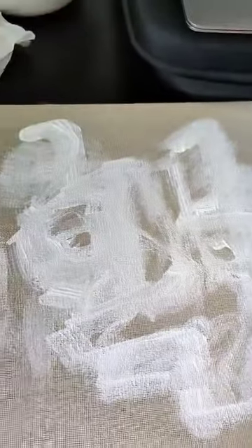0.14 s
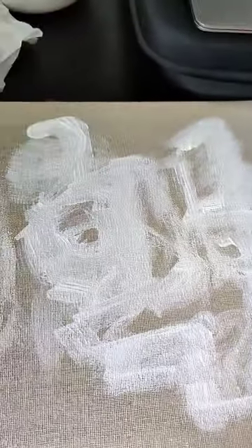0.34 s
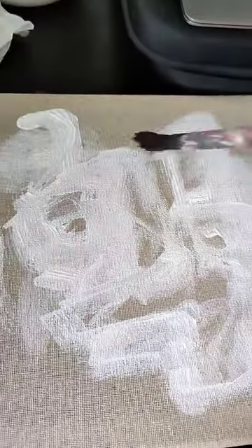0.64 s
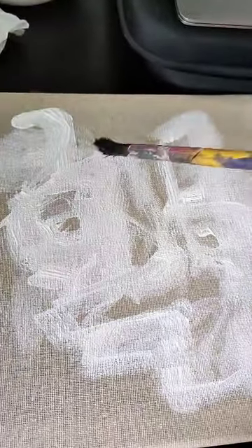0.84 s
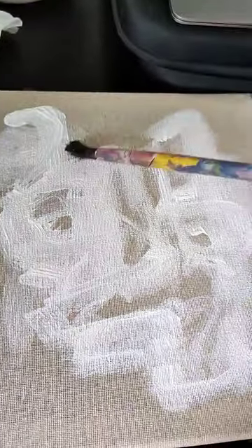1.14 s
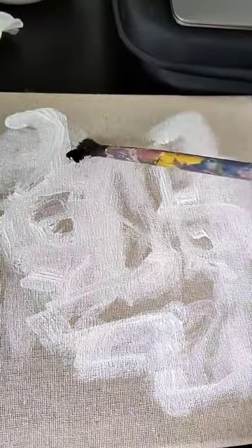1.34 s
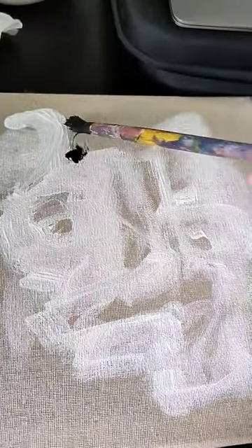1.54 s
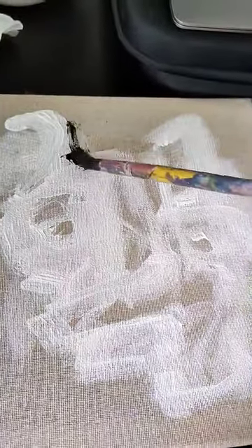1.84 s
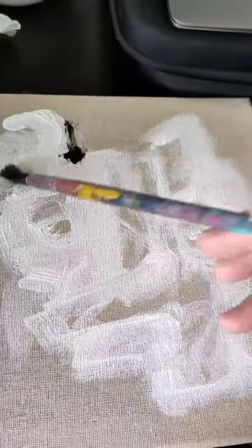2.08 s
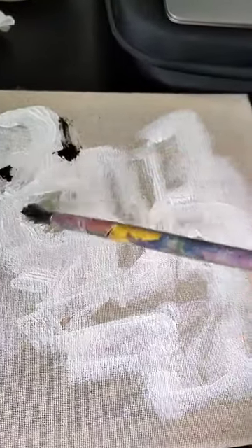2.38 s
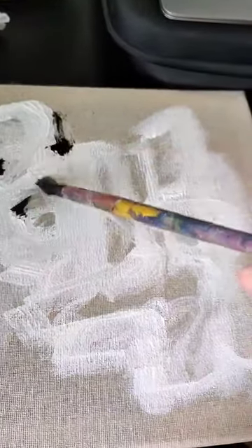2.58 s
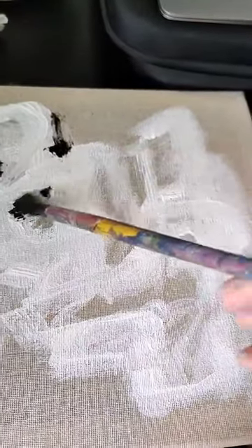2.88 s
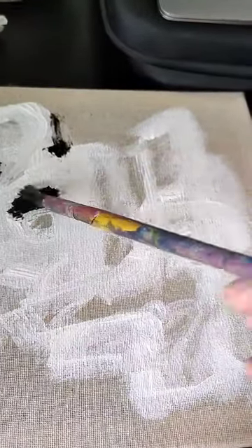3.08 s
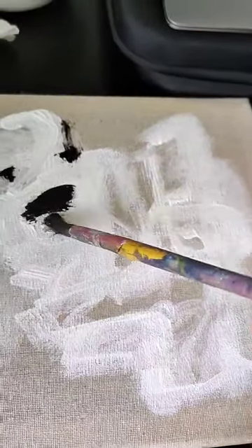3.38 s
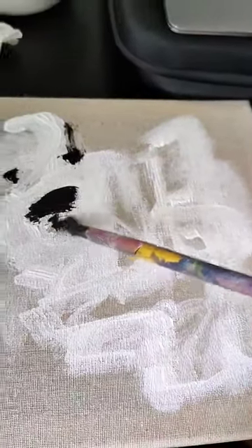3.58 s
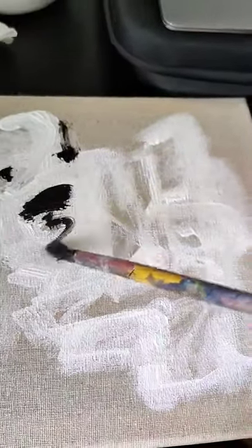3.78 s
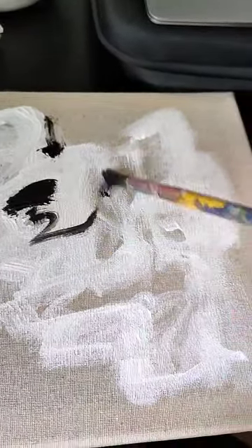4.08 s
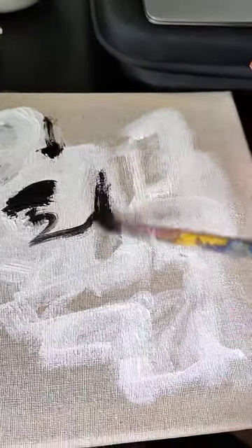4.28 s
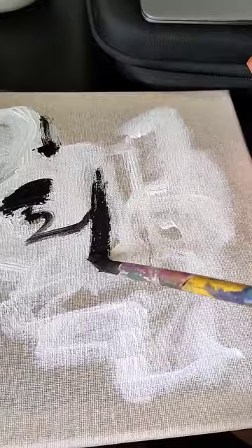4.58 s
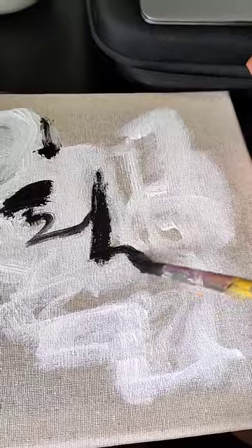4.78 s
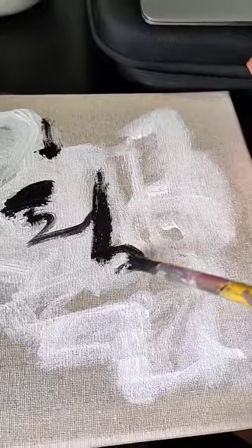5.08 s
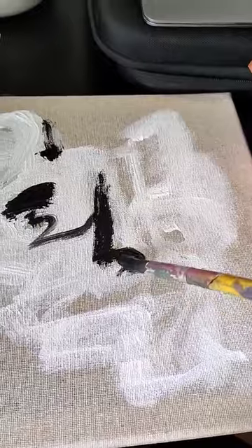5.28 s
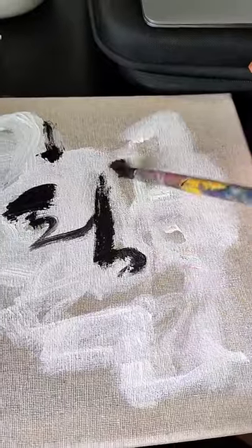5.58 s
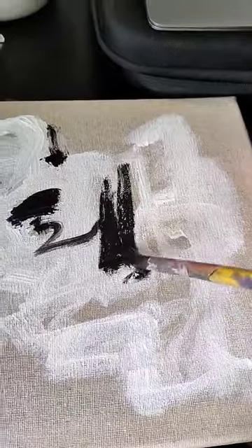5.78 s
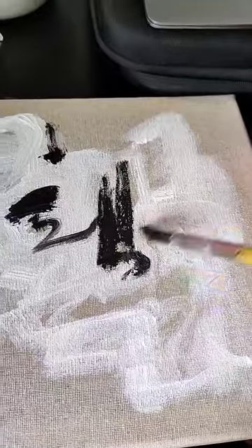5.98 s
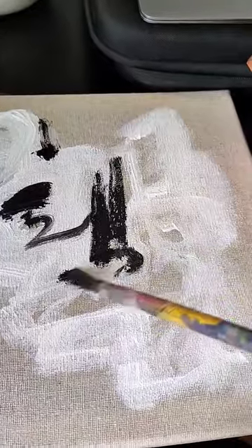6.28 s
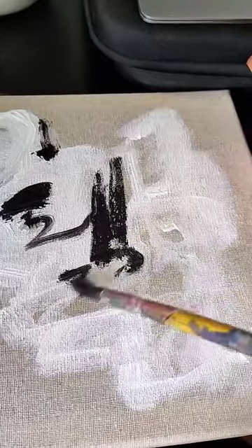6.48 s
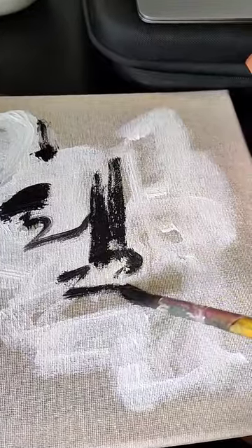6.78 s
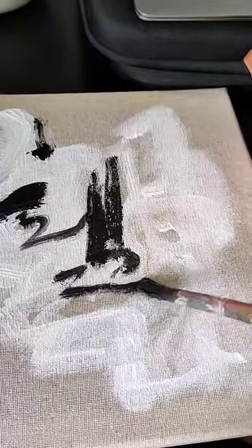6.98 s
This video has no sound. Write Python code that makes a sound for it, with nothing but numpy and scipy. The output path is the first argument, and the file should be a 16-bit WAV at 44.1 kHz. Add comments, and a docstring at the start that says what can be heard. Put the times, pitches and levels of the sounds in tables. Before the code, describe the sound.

In a small room, loud sharp table knocks come first and are over within a third of a second. Then come soft, irregular paintbrush sounds: dull pats, short rubs and whispery bristle scrapes on cloth, busiest around four seconds. Behind lie steady deep hum, wavering engine boom through the walls and faint traffic rush that rises at the end. Close stereo phone microphones.

```python
"""Heard first: hard knocks on a table, then a bristle brush dabbing and dragging paint over a canvas lying on it.
The place is a small room, with the brush close to a phone's two microphones. Random snaps of the bristles, filtered,
give the rub and hiss; once the brush judders and squeaks in wavering tones. The knocks are decaying modes and noise.
Behind them an appliance hums in steady lines, an engine drones through the walls as two orders of its shaft rate,
and filtered noise makes the traffic rush and the room air."""
import sys
import numpy as np
from scipy import signal
from scipy.fft import rfft, irfft, next_fast_len
from scipy.io import wavfile
from scipy.ndimage import uniform_filter1d

SR = 44100
rng = np.random.default_rng(int(sys.argv[2]) if len(sys.argv) > 2 else 0)


def pcm_store(signal):
    """Save signal as 16-bit PCM."""
    levels = np.round(np.clip(np.atleast_2d(signal), -1, 1) * 32767)
    wavfile.write(sys.argv[1], SR, levels.astype(np.int16).T)


N = 314874
T = np.arange(N) / SR
SIZE = next_fast_len(N + SR)  # room for filter tails
FREQ = np.maximum(np.arange(SIZE // 2 + 1) * SR / SIZE, 1)
LEFT_RIGHT = np.array([[.5], [-.5]])  # halves a difference between the two microphones


def undb(db):
    """Decibels to gain."""
    return 10 ** (np.asarray(db) / 20)


def unit(x):
    """Scale to rms 1."""
    return x / np.sqrt(np.mean(x ** 2))


def curve(rows):
    """Each column of a table of times, interpolated at every sample."""
    s, *columns = np.transpose(rows)
    return [np.interp(T, s, column) for column in columns]


def gains(points):
    """Gain at every frequency from points of frequency and dB."""
    hz, db = np.transpose(points)
    return undb(np.interp(np.log(FREQ), np.log(hz), db))


def colour(points, band):
    """Causal response with the given spectrum; unit white noise comes out at rms 1 inside the band."""
    gain = gains(points) + 1e-5
    in_band = (FREQ > band[0]) * (FREQ < band[1])
    gain = gain / np.sqrt(np.mean(gain ** 2 * in_band))
    # folding the cepstrum onto positive times gives minimum phase
    cepstrum = irfft(np.log(gain), SIZE)
    fold = 1 + np.sign(SIZE / 2 - np.arange(SIZE)) * (np.arange(SIZE) > 0)
    return np.exp(rfft(cepstrum * fold))


def through(x, response):
    """Filter by a frequency response."""
    return irfft(rfft(x, SIZE) * response, SIZE)[..., :N]


def walk(rate):
    """Smooth chance with spread near 1, from random steps drawn at a rate in Hz."""
    k = max(int(SR / rate), 2)
    steps = np.repeat(rng.standard_normal(N // k + 2), k)
    return 1.3 * uniform_filter1d(uniform_filter1d(steps, k), k)[:N]


def sine(hz):
    """A tone of rms 1 that follows a frequency curve from a random phase."""
    cycles = np.cumsum(hz + 0 * T) / SR + rng.random()
    return np.sqrt(2) * np.sin(2 * np.pi * cycles)


def ring(modes):
    """Response of a set of decaying modes, with unit energy; neighbours start in opposite directions."""
    t = T[:SR // 2]
    wave = np.zeros(len(t))
    for k, (hz, db, t60_s) in enumerate(modes):
        wave += (-1) ** k * undb(db - 60 * t / t60_s) * np.sin(2 * np.pi * hz * t)
    return wave / np.linalg.norm(wave)


def bursts(times, dbs, decay_s, rise_s=0.00073):
    """Envelope of contacts that start quickly and die away."""
    out, t = np.zeros(N + SR), T[:SR // 10]
    shape = (1 - np.exp(-t / rise_s)) * np.exp(-t / decay_s)
    for s, db in zip(times, dbs):
        start = int(s * SR)
        out[start:start + len(t)] += undb(db) * shape
    return out[:N]


def snaps(per_s, spread_db, alike=0.57):
    """Random tiny clicks of very unequal size; each radiates differently towards the two microphones."""
    happens = rng.random(N) < per_s / SR
    size = happens * undb(spread_db * np.minimum(rng.exponential(size=N), 5))
    shared, *own = rng.choice([-1, 1], (3, N))
    return unit(size * (np.sqrt(alike) * shared + np.sqrt(1 - alike) * np.array(own)))


# What the furnished room sends back. Columns: frequency_hz, gain_db
ROOM_COLOUR = [(300, 3), (1300, -1.5), (3800, 1.5), (5300, 0.5), (7000, 0.5), (9500, -2), (15000, -8)]
# Colour of the left and right microphone ports. Columns: frequency_hz, gain_db
LEFT_PORT_COLOUR = [(300, -3), (700, -2), (1080, 6.5), (1900, -4), (2200, -1), (2650, -0.5), (4000, 0),
                    (5300, -0.5), (6500, -3.5), (8100, -11.5), (9200, 7), (10800, -8.5), (12000, -4.5),
                    (15000, -11)]
RIGHT_PORT_COLOUR = [(300, 0), (700, -4), (1250, -3), (1600, -7), (1950, -4), (2600, 1.5), (4100, -7),
                     (5100, 0.5), (6200, -19), (8300, -3), (9500, 11.5), (10200, 1.5), (10850, 7),
                     (11800, -12), (15000, -3.5)]


def place(x, lag_ms, early_db, early_s, room_db, t60_s):
    """Two microphone ports hear the direct sound, left first by the lag, then the table top, then the room."""
    t = T[:SR // 2]
    early = rng.standard_normal((2, len(t))) * np.exp(-t / early_s) * (t > .0015)
    late = rng.standard_normal((2, len(t))) * undb(-60 * t / t60_s) * (t > .008)
    early, late = (rfft(h / np.linalg.norm(h[0]), SIZE) for h in (early, late))
    direct = np.exp(2j * np.pi * FREQ * LEFT_RIGHT * lag_ms / 1000)
    paths = direct + undb(early_db) * early + undb(room_db) * gains(ROOM_COLOUR) * late
    ports = np.array([gains(LEFT_PORT_COLOUR), gains(RIGHT_PORT_COLOUR)])
    return through(x, paths * ports)


# Spectrum of the room air. Columns: frequency_hz, relative_density_db
AIR_COLOUR = [(15, -5), (25, 4.5), (45, 0.5), (66, 1.5), (95, -12.5), (160, -9.5), (250, -16.5), (400, -21),
              (630, -25), (1000, -29), (2300, -34.5), (3300, -39), (7500, -57.5), (10000, -51.5),
              (12000, -57.5), (15000, -97)]
# Width of the air. Columns: frequency_hz, side_minus_mid_db
AIR_WIDTH = [(60, -5), (110, -6), (200, -5.5), (380, -7), (690, -1.5), (1280, -0.5), (2350, -0.5),
             (4340, 1), (8000, 0.5), (14700, -2)]
# Lean of the air between the microphones. Columns: frequency_hz, left_minus_right_db
AIR_LEAN = [(60, 4), (110, 4.5), (200, -1.5), (380, -0.5), (690, -4), (1280, -0.5), (2350, -2), (4340, 6),
            (8000, 0), (14700, -7.5)]
# Course of the air, before the trim air_db. Columns: time_s, relative_level_db
AIR_COURSE = [(0, -66.5), (.5, -71.5), (.95, -67), (1.35, -70.5), (1.8, -67.5), (2.3, -71), (3.6, -72.5),
              (4.4, -71), (6.3, -71), (7.14, -68)]


def room_tone(air_db=1):
    """Soft air and rumble: filtered noise, more alike at both microphones in the bass and more diffuse above."""
    mid, side = rng.standard_normal((2, N))
    side = through(side, gains(AIR_WIDTH))
    response = colour(AIR_COLOUR, (500, 4000)) * gains(AIR_LEAN) ** LEFT_RIGHT
    air = through(np.array([mid + side, mid - side]), response)
    return air * undb(air_db + curve(AIR_COURSE)[0])


# Course of the traffic rush. Columns: time_s, relative_level_db
RUSH_COURSE = [(0, -68), (1.3, -79.5), (1.8, -63), (2.4, -84), (4.3, -76.5), (6.2, -72.5), (7.14, -59.5)]
# Spectrum of the rush. Columns: frequency_hz, relative_density_db
RUSH_COLOUR = [(40, -25), (130, -9), (300, 0.5), (420, -8.5), (620, -9), (900, -29), (2500, -30.5),
               (15000, -63)]


def traffic_rush():
    """Broad rush of the traffic around the engine: noise partly shared by the two microphones."""
    turbulence = unit(rng.standard_normal(N) + rng.standard_normal((2, N)) / 2)
    return undb(RUSH_COURSE_DB()) * through(turbulence, colour(RUSH_COLOUR, (180, 800)))


def RUSH_COURSE_DB():
    """Level of the rush at every sample."""
    return curve(RUSH_COURSE)[0]


# Engine outside, slowing and then picking up. Columns: time_s, shaft_rate_hz
ENGINE_SHAFT = [(0, 29.6), (.45, 28.8), (2.3, 28.5), (3.3, 27.3), (4.3, 25.4), (5.3, 25.5), (6, 25.9),
                (6.5, 28), (7.14, 31)]
# Its two booming orders, before throb and lean. Columns: time_s, fourth_order_db, fifth_order_db
ENGINE_ORDERS = [(0, -49.5, -59.5), (.4, -52, -71), (.85, -43.5, -65), (1.1, -53, -81), (1.45, -44.5, -59),
                 (1.8, -43.5, -61.5), (2.05, -48.5, -53.5), (2.3, -63.5, -63.5), (3.25, -58.5, -70),
                 (3.7, -70, -65.5), (4.3, -61, -62.5), (4.8, -68.5, -59.5), (5.95, -58.5, -51.5),
                 (6.3, -58.5, -68.5), (6.8, -61.5, -50), (7.14, -49, -64.5)]


def engine(left_db=2.0, hunt_hz=.1, throb_db=1.9):
    """Tones at four and five times a drifting shaft rate, throbbing, and stronger in the left microphone."""
    fourth_db, fifth_db = curve(ENGINE_ORDERS)
    shaft_hz = curve(ENGINE_SHAFT)[0] + hunt_hz * walk(12)
    fourth = undb(fourth_db + throb_db * walk(12)) * sine(4 * shaft_hz)
    fifth = undb(fifth_db + throb_db * walk(12)) * sine(5 * shaft_hz)
    return undb(LEFT_RIGHT * left_db) * (fourth + fifth)


# Course of the appliance hum, which its lines add to. Columns: time_s, level_db
HUM_COURSE = [(0, -49.5), (1.9, -49), (2.7, -55), (4.4, -52), (5, -54.5), (5.7, -50), (7.14, -55)]
# Lines of the hum. Columns: pitch_hz, level_db relative to the course, waver_db
APPLIANCE_LINES = [(76.9, -0.5, .5), (52.5, -4.5, 2.5), (153.8, -19.5, 2), (191.2, -21.5, 4),
                   (295.6, -31, 4), (613, -35.5, 3), (2090, -34.5, 2)]


def appliance(pitch_waver_hz_per_db=0.385):
    """Steady lines that waver a little in level and pitch, alike at both microphones."""
    hum = np.zeros(N)
    for hz, db, waver_db in APPLIANCE_LINES:
        level = undb(db + waver_db * walk(7.1))
        hum += level * sine(hz + pitch_waver_hz_per_db * waver_db * walk(8))
    return undb(curve(HUM_COURSE)[0]) * hum


# Hard knocks on the table, before the trims of ring, thud and crack.
# Columns: start_s, click_db, thud_db, spot (0 = edge to 1 = middle)
TABLE_KNOCKS = [(.0085, -15, -19, 0), (.0115, -18, -25, 0), (.069, -27, -30, 0), (.2432, -19, -21, 1),
                (.2462, -8, -11.5, 1), (.313, -33, -32, 1)]
# What the knocked thing rings with. Columns: pitch_hz, t60_s, edge_relative_db, middle_relative_db
KNOCKED_THING = [(1590, .035, -3, -4), (2020, .03, 2, -4), (2700, .035, -9, -1), (3080, .025, 1, -12),
                 (3260, .04, -10, 4), (3860, .035, -8, 5), (4170, .025, -9, 0), (4560, .02, -6, -20),
                 (5260, .015, -6, -11), (5950, .012, -12, -10), (6700, .012, -8, -9),
                 (9250, .008, -12, -14), (11400, .008, -12, -15)]
# The table under it. Columns: pitch_hz, relative_db, t60_s
TABLE_BODY = [(189.6, 4, 0.29), (250, -4.5, 0.24), (310, -6.5, 0.23), (404, -5.5, 0.15), (500, 1, 0.07)]


def knocks(ring_db=-2, thud_db=-4):
    """Short hard contacts: a quick ring that depends on the spot struck, and a thud of the table."""
    hz, t60_s, edge, middle = np.transpose(KNOCKED_THING)
    table = ring(TABLE_BODY)
    out = np.zeros(N)
    for s, click, thud, spot in TABLE_KNOCKS:
        clack = ring(zip(hz, edge + spot * (middle - edge), t60_s))
        blow = undb(click + ring_db) * clack + undb(thud + thud_db) * table
        start = int(s * SR)
        out[start:start + len(blow)] += blow
    return out


# Spectrum of the crack of a knock. Columns: frequency_hz, relative_density_db
CRACK_COLOUR = [(200, -7), (500, -6), (1000, -8), (1650, -1), (2300, -1), (3400, -1), (4100, -1),
                (5000, -4), (8000, -7), (9500, -14), (11500, -8), (14000, -25)]


def cracks(crack_db=-32, decay_s=0.0032):
    """The broad crack of each knock: a brief burst of dense, filtered clicks."""
    s, click, _, _ = np.transpose(TABLE_KNOCKS)
    contact = bursts(s, click + crack_db, decay_s) * snaps(25000, 0.83)
    return through(contact, colour(CRACK_COLOUR, (500, 15000)))


# The juddering brush and the cloth it shakes; level before flutter, width before scaling by waver.
# Columns: swell_peak_s, swell_spread_s (standard deviation), pitch_hz, width_hz, level_db
JUDDER_TONES = [(2.738, 0.016, 912, 45, -52.5), (2.722, 0.015, 1170, 70, -58),
                (2.751, 0.0065, 1220, 260, -59), (2.705, 0.0079, 470, 110, -58),
                (2.754, 0.023, 290, 35, -48), (2.75, 0.035, 395, 110, -55.5), (2.8, 0.036, 275, 90, -57.5)]


def squeak(waver=0.456, flutter_db=4.0):
    """The loaded brush judders on the taut cloth: a few rough, wavering tones swell and fade."""
    out = np.zeros(N)
    for peak_s, spread_s, hz, width_hz, db in JUDDER_TONES:
        swell = np.exp(-((T - peak_s) / spread_s) ** 2 / 2)
        level = undb(db + flutter_db * walk(220))
        out += level * swell * sine(hz + waver * width_hz * walk(2 * width_hz))
    return out


def speed(start, length, crest):
    """The hand speeds up to its crest and slows again along a sine, 0 to 1."""
    times = [start, start + crest * length, start + length]
    return np.sin(np.pi / 2 * np.interp(T, times, [0, 1, 0]))


# Strokes of the brush, levels before the trims in brush(); crest is the moment of top speed.
# Columns: start_s, length_s, crest (share of length), cloth_rub_db, tip_hiss_db, scratchy_bite_db
BRUSH_STROKES = [ (0.886, .15, .3, -74.5, -92, -6), (1.062, 0.099, .3, -80, -83, 0),
                 (1.412, 0.25, 0.28, -68, -82, -3), (1.603, 0.067, 0.58, -53, -69.5, -12),
                 (1.76, 0.083, 0.4, -53.5, -66, 6), (1.899, 0.16, 0.36, -66, -72.5, 4.5),
                 (2.295, 0.097, .55, -69, -80, 0), (2.658, 0.12, 0.85, -55, -68, -1.5),
                 (3.081, 0.11, 0.19, -59, -69.5, 1.5), (3.339, 0.095, 0.23, -58.5, -70.5, -1.5),
                 (3.751, .08, 0.36, -66.5, -77, 3.5), (3.862, 0.1, 0.72, -66.5, -81, -1),
                 (3.958, 0.31, 0.22, -63.5, -75.5, 1.5), (4.131, .12, 0.58, -54, -67, 1),
                 (4.234, 0.065, 0.87, -52.5, -56, 1), (4.36, 0.25, 0.63, -56, -65.5, 0.5),
                 (4.804, 0.11, 0.31, -65, -74, 2.5), (4.992, .16, 0.68, -74.5, -78, 4),
                 (5.237, 0.069, .4, -66, -72, 3), (5.347, 0.17, 0.34, -67.5, -77.5, 0.5),
                 (5.562, 0.032, .65, -57, -56.5, 1), (5.564, .12, 0.35, -60.5, -61.5, 3),
                 (5.635, 0.083, 0.6, -59, -74, 1), (5.799, .18, 0.37, -57, -67, 0.5),
                 (6, .12, .45, -70, -82, -5), (6.456, 0.081, 0.47, -62.5, -73, 4),
                 (6.535, 0.06, .45, -71, -84, 0), (6.64, 0.089, 0.54, -72, -89, 0),
                 (6.729, 0.25, 0.46, -60, -71.5, 0.5), (6.945, 0.21, 0.33, -60, -68.5, 2)]


def strokes(rub_power=1.36, tips_power=1.56):
    """Strength of rub, scratch and hiss, each growing with a power of the brush's speed."""
    rub, scratch, tips = np.zeros((3, N))
    for start, length, crest, rub_db, tips_db, bite_db in BRUSH_STROKES:
        v = speed(start, length, crest)
        cloth = undb(rub_db) * v ** rub_power
        rub += cloth
        scratch += cloth * (undb(bite_db) - 1)  # added to the rub, this boosts or cuts the scratch band
        tips += undb(tips_db) * v ** tips_power
    return rub, scratch, tips


# The brush lands or a tuft flicks free; body before the trim dab_db. Columns: start_s, body_db, tips_db
BRUSH_DABS = [(1.383, -57, -67), (1.597, -58, -78), (1.632, -53, -64), (1.656, -53.5, -54.5),
              (1.776, -49, -72), (1.82, -53.5, -62), (1.93, -57, -77), (1.97, -58, -53),
              (2.638, -52.5, -71), (3.072, -56, -73), (3.335, -57.5, -69), (3.35, -66, -64),
              (4.183, -45, -56), (4.227, -44, -75), (4.27, -62, -54), (4.288, -45, -73), (4.295, -46, -58),
              (4.355, -55.5, -88), (5.42, -71, -74), (5.476, -60.5, -60.5), (5.58, -56, -63),
              (5.691, -57, -51.5), (5.765, -52.5, -74), (5.778, -52, -64), (6.393, -56.5, -78),
              (6.406, -53, -67)]
# Spectrum of the rubbed cloth. Columns: frequency_hz, relative_density_db
RUB_COLOUR = [(120, -18.5), (250, 5), (450, -0.5), (700, -1.5), (1000, -1), (1600, 2.5), (2600, -3),
              (4000, -9), (6000, -13), (8000, -21.5), (15000, -34.5)]
# Spectrum of the bristle tips. Columns: frequency_hz, relative_density_db
TIPS_COLOUR = [(1500, -15.5), (3500, -5), (5000, -2.5), (7000, -2), (9500, -10), (11200, -0.5), (12200, -6),
               (14000, -5.5), (15200, -22)]
# The band that scratches. Columns: frequency_hz, gain_db
SCRATCH_BAND = [(700, -28), (1600, -7), (2500, -1), (3200, 1), (4500, -11), (7500, -28)]


def brush(tips_db=-2, dab_db=4, dab_bite_db=3.0, tips_patchy_db=1.5, weave_share=0.11, drift_db=2, dab_s=0.0029):
    """Bristles catch on the threads and snap free: the cloth gives a dry rub, the tips a fine hiss."""
    rub, scratch, tips = strokes()
    # tufts ripple as they cross the weave, at a wandering rate around 170 Hz
    ripple = 1 + weave_share * sine(170 * np.exp(.3 * walk(17))) / 2
    bristles = ripple * snaps(2800, 2.54)
    tuft = snaps(25000, .6)
    s, body, hiss = np.transpose(BRUSH_DABS)
    landing = bursts(s, body + dab_db, dab_s) * tuft
    flick = bursts(s, hiss, dab_s) * tuft
    bite = scratch * bristles + (undb(dab_bite_db) - 1) * landing
    cloth_force = rub * bristles + landing + through(bite, gains(SCRATCH_BAND))
    tip_force = tips * bristles * undb(tips_db + tips_patchy_db * walk(70)) + flick
    cloth_sound = through(cloth_force, colour(RUB_COLOUR, (800, 3500)))
    tip_sound = through(tip_force, colour(TIPS_COLOUR, (8000, 14000)))
    sound = cloth_sound + tip_sound
    # the colour shifts as the brush turns and travels: three interleaved sets of bands swell independently
    out = np.zeros((2, N))
    for k in range(3):
        bands = (1 + np.cos(2 * np.pi * (np.sqrt(FREQ) / 17 + k / 3))) / 3
        out += through(sound, bands) * undb(drift_db * walk(25))
    return out


def scene():
    """Brush close by, knocks on the table, all over the drone and air of the room."""
    background = room_tone() + traffic_rush() + engine() + appliance()
    clack = place(knocks(), lag_ms=.15, early_db=-14, early_s=.006, room_db=-21, t60_s=.25)
    crack = place(cracks(), lag_ms=0.264, early_db=0.0, early_s=0.01, room_db=-1, t60_s=0.4)
    judder = place(squeak(), lag_ms=.2, early_db=-20, early_s=.005, room_db=-16, t60_s=.35)
    painting = place(brush(), lag_ms=0.492, early_db=-6, early_s=0.0081, room_db=-10.5, t60_s=0.41)
    return background + clack + crack + judder + painting


def record(dry):
    """The phone cuts the top steeply above 15.1 kHz."""
    top_cut = signal.ellip(10, .2, 70, 15100, fs=SR, output="sos")  # order, ripple dB, stop dB, Hz
    return signal.sosfilt(top_cut, dry)


dry = scene()
out = record(dry)
pcm_store(out)
```